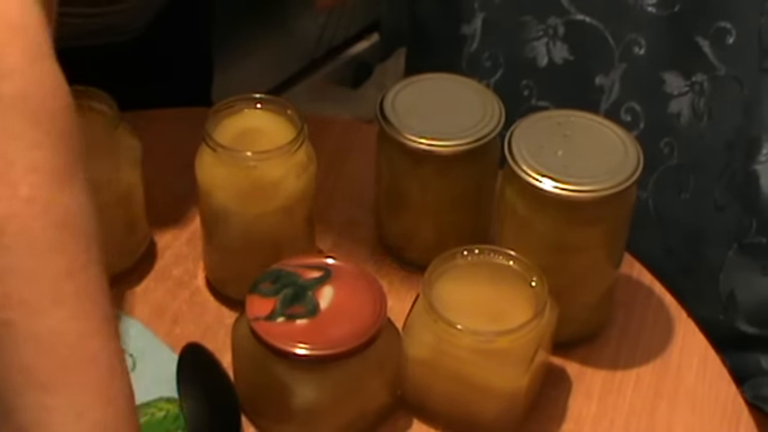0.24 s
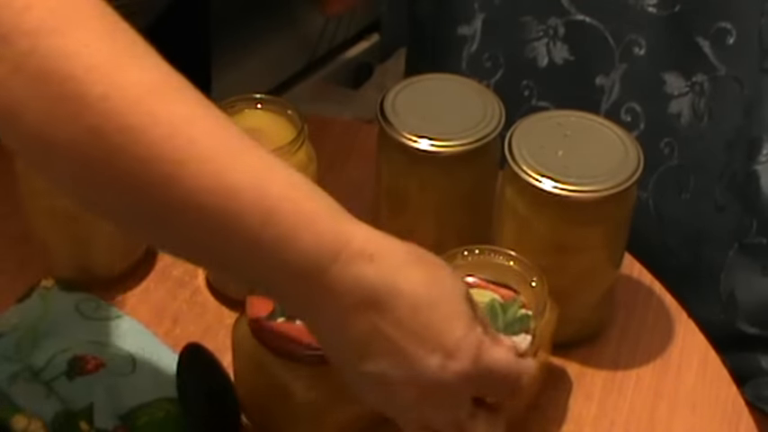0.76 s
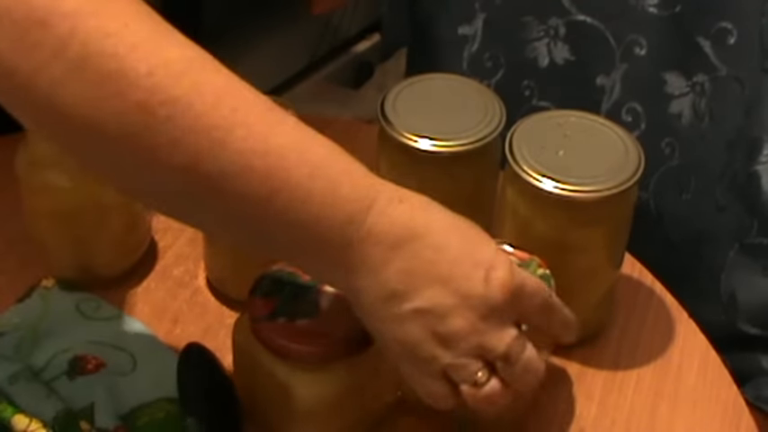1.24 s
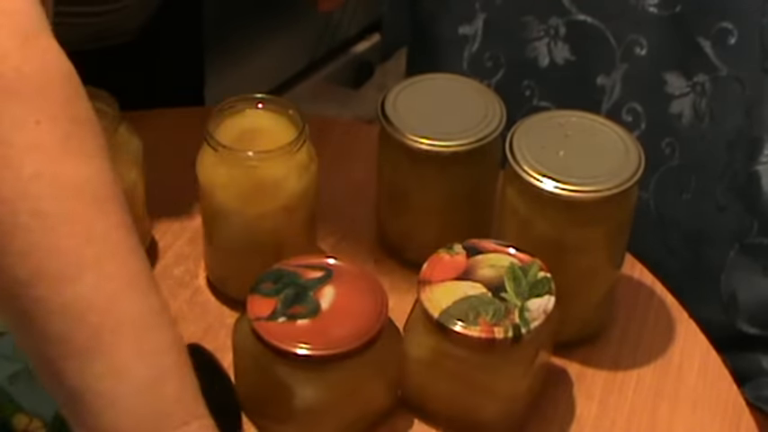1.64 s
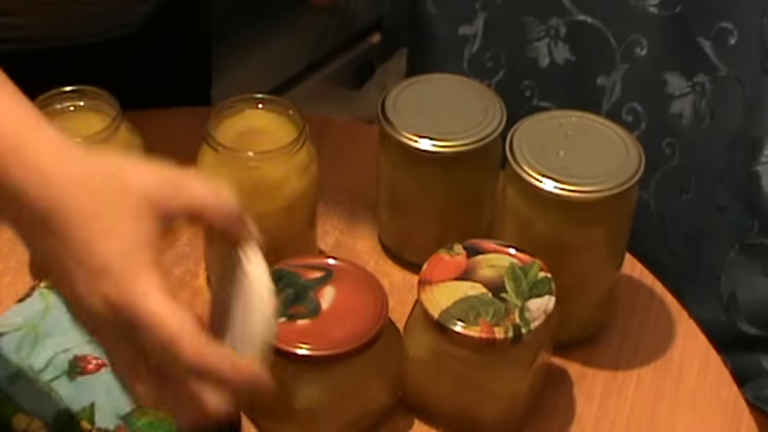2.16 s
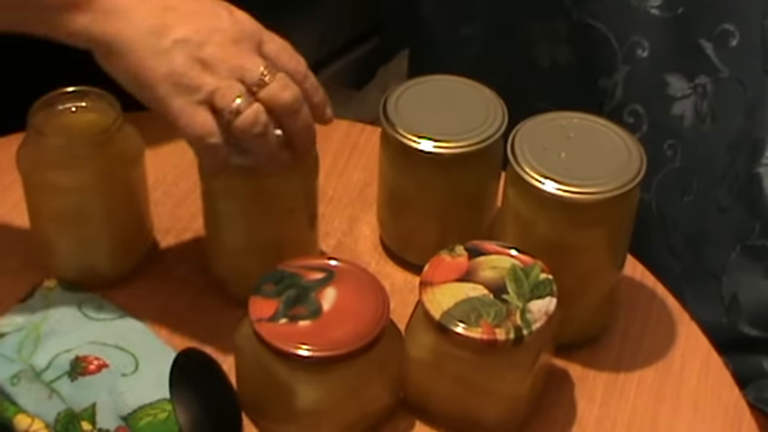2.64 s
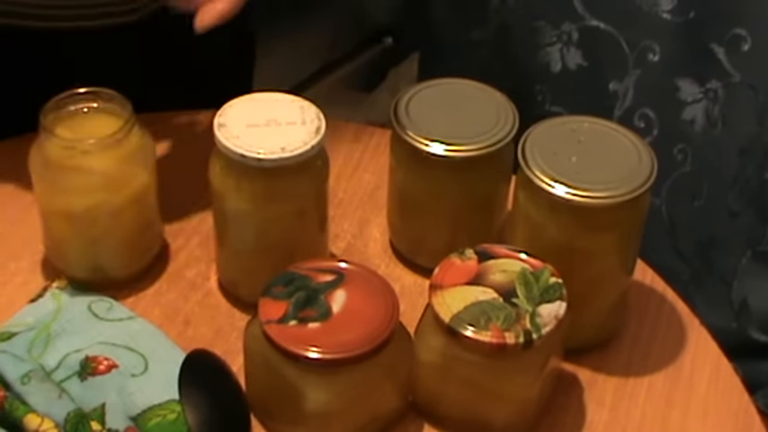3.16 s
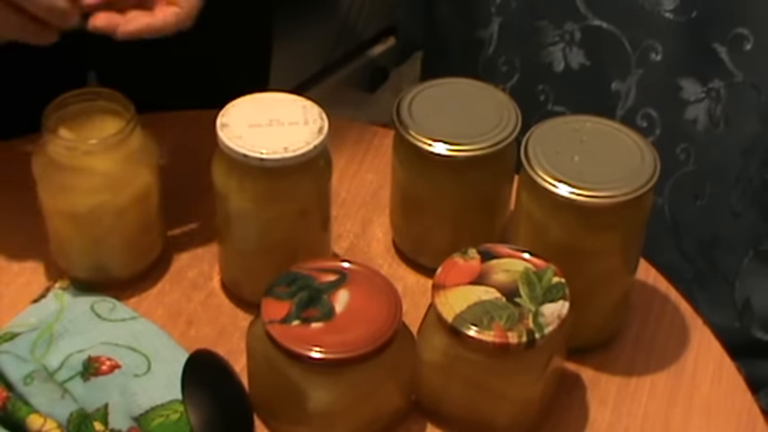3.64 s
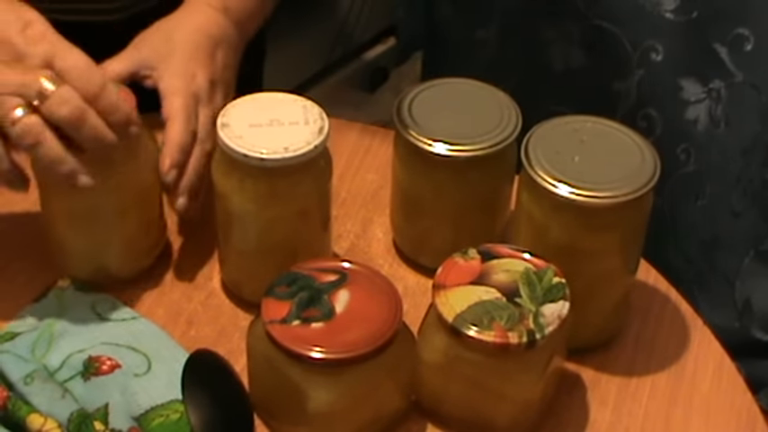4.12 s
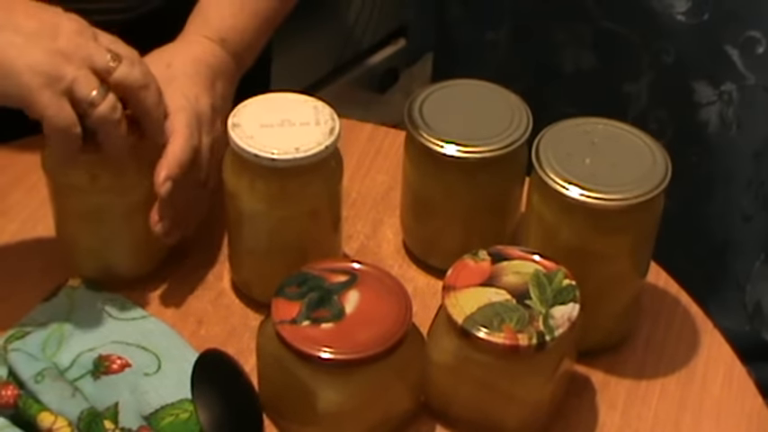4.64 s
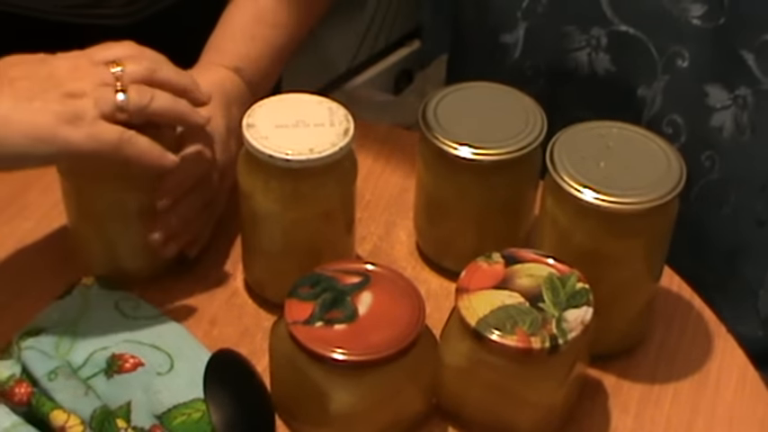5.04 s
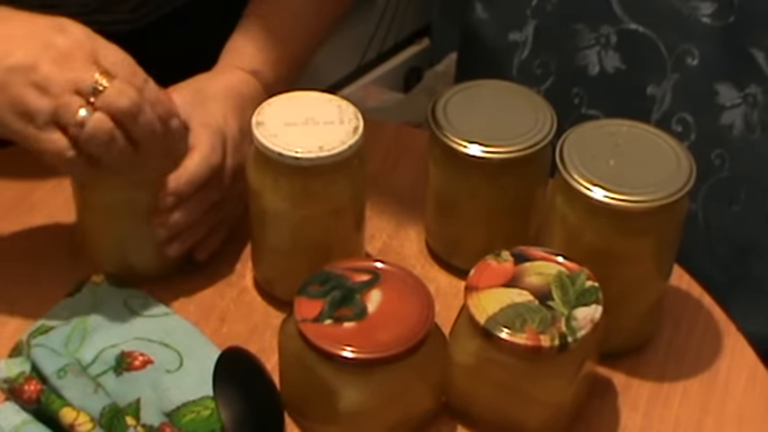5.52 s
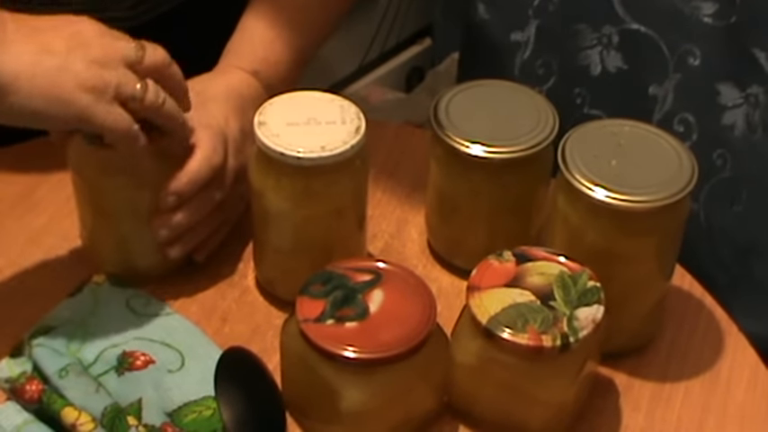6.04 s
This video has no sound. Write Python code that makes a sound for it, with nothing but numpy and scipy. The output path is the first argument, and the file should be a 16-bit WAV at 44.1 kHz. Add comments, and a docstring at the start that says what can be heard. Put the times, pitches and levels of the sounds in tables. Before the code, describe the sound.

In a quiet small kitchen, metal lids tap and clatter on filled jars and grind along glass threads, with a crisp click near the end.

```python
"""Screwing lids onto glass jars

Metal twist-off lids are set on three filled glass jars on a kitchen table and screwed down.
Touches are noise cracks plus decaying modes and clatter; twists are grains through a sagging resonance.
Jar slides, finger rub, table booms and one dry snap are shaped grains and noise.
All but the snap gets a small-room tail; noise, arm rustle and a thin whine lie beneath."""
import sys
import numpy as np
from scipy import signal
from scipy.fft import rfft, irfft, next_fast_len
from scipy.io import wavfile

SR = 44100
rng = np.random.default_rng(int(sys.argv[2]) if len(sys.argv) > 2 else 0)


def generate_wav(sig):
    """Save sig (samples, or channels by samples) to the path in sys.argv[1] as 16-bit PCM at SR."""
    pcm = np.round(np.clip(np.atleast_2d(sig).T, -1, 1) * 32767).astype(np.int16)
    wavfile.write(sys.argv[1], SR, pcm)


N = 276948

# Lid touches glass: t/s, force/dB, edge/dB (high: bare metal on rim, low: soft seal), rebounds
CONTACTS = [(0.513, -50.5, 5, 0), (0.53, -67.5, 18.5, 0), (0.601, -45.5, -6, 0), (0.783, -63, -5, 0),
            (0.827, -86, 19.5, 0), (1.1465, -27.5, -2, 0), (1.2256, -29.5, -1, 0), (1.253, -41, 6.5, 0),
            (1.364, -39.5, 0.5, 0), (1.384, -40.5, 6, 0), (1.394, -33.5, -17, 0), (1.399, -41.5, -12.5, 0),
            (1.416, -28.5, -14, 0), (1.4847, -30, -13.5, 0), (1.51, -38, -9, 0), (1.5548, -29.5, -8, 0),
            (1.565, -36, 2.5, 0), (1.576, -24, -2, 1), (1.595, -25, -4.5, 1), (1.64, -27, -4, 1),
            (1.656, -25.5, -12, 0), (2.894, -47.5, -5.5, 0), (2.9782, -33, -12.5, 0),
            (2.9844, -20.5, -15, 0), (3.0282, -22.5, -14, 2), (3.087, -37, -19, 0), (3.483, -52, 12, 0),
            (3.972, -70.5, 13.5, 0), (4.004, -65, 8.5, 0), (4.41, -29, -1, 1), (4.427, -33.5, -27, 0),
            (4.458, -38, -5.5, 0), (4.484, -31.5, -0.5, 1), (4.506, -34, -8, 0), (4.546, -51, -9.5, 0),
            (4.668, -38.5, -11.5, 0), (4.716, -44, -9.5, 0), (4.7444, -33, -7.5, 0),
            (4.7618, -36.5, -3.5, 1), (4.8271, -43, -8, 0), (4.873, -44.5, -7, 0), (4.89, -41, -3, 2),
            (4.914, -36, -14, 0), (5.284, -63, -23, 0), (5.872, -55.5, -7, 0), (6.029, -45, -39, 0),
            (6.076, -46.5, -11.5, 0), (6.1455, -45, -26, 0), (6.1676, -31.5, -17.5, 1), (6.191, -45, -3, 0)]
# Modes of a spare lid, a loose lid on the front jar's rim, each lidded jar,
# and the left jar seated and gripped: f/Hz, relative level/dB, t60/s
SPARE_MODES = [(1730, -6, 0.14), (2550, 2, 0.11), (2550, 1.5, 0.1), (3650, -3, 0.066), (3900, -20.5, 0.055),
               (4907, -6, 0.1), (5017, -7, 0.097), (6630, -8, 0.03)]
RIM_MODES = [(685, 3, .12), (1066, -12.5, .13), (1240, -17, 0.24), (1480, -12, 0.35), (1575, -4, 0.15),
             (1620, -7.5, .13), (2214, -11, 0.21), (2980, 1, 0.16), (3670, 10, 0.099), (3790, 7, 0.067),
             (3800, 2, 0.14), (4950, -6.5, .08), (9760, -22.5, 0.074), (10650, 14, 0.066),
             (11250, -27, .05)]
FRONT_MODES = [(681, -20.5, 0.18), (1060, -8, 0.096), (1450, -1, 0.26), (1550, -12, .17),
               (1683, -2.5, 0.16), (1720, 16, 0.086), (1810, -1.5, .14), (1810, -17, 0.17),
               (2146, -3.5, 0.21), (2190, 1, .15), (3030, -8.5, 0.16), (3456, -9.5, 0.1), (3840, -8, .18),
               (4880, -10, 0.14), (5790, -21, 0.19), (9650, -8, 0.043), (10640, 0, 0.025)]
MIDDLE_MODES = [(185, -13, 0.31), (302.5, -10.5, 0.17), (621.6, -9, 0.21), (897, -15, 0.15),
                (958, -30, 0.21), (1528, -10, 0.22), (1685, -18, 0.22), (1690, -15, 0.16),
                (1877, 11.5, 0.077), (1767, -8, 0.16), (1870, 6, 0.14), (2596, -14, 0.1),
                (3760, -18, 0.089), (4050, -4, 0.08), (4510, -27, 0.099)]
LEFT_MODES = [(458, -23, 0.11), (1590, -15.5, 0.15), (1644, 3, 0.2), (1782, 7.5, 0.2), (1877, 2.5, 0.14),
              (1930, -6, 0.13), (2510, -15.5, 0.12), (3650, -19, 0.091), (3757, -7.5, 0.088),
              (4600, -27, 0.066), (5000, -19.5, 0.1), (6360, -35, 0.063), (6700, -24, 0.088),
              (7940, -30, 0.08)]
SEATED_MODES = [(444, -15, 0.24), (1031, -9.5, 0.078), (1128, 0, 0.11), (1320, -4, 0.29), (1690, -22, 0.17),
                (1780, 4, 0.18), (1850, -20, 0.15), (2060, 8, 0.17), (3460, -10, 0.12), (3900, -5, 0.066),
                (4080, -1, 0.03), (3930, -5, 0.17), (6953, 4, 0.062), (7640, 8, 0.054), (9640, 3, 0.046),
                (9900, -23, 0.085)]
GRIPPED_MODES = [(455, -1, 0.12), (1136, 0, .12), (1333, 2, 0.068), (1505, 3.5, 0.063), (1699, -1.5, 0.09),
                 (2565, -14.5, 0.12), (4330, -8, 0.05), (4960, -3, 0.024), (6400, -23, 0.059)]
# Dense clatter between those modes: f/Hz, relative density/(dB per Hz)
SPARE_CLATTER = [(120, -49), (200, -20), (957, -12.5), (1300, -23), (1620, -7), (2560, -17), (2800, -16.5),
                 (4920, -19.5), (7220, -17), (8200, -10), (15500, -21)]
RIM_CLATTER = [(88, -52), (150, -15), (296, -4), (561, -11), (631, 4), (912, -12), (1570, 2), (1870, -10),
               (2700, -8), (2920, 1.5), (3550, -14.5), (3830, -2), (7000, -37.5), (10300, -22),
               (15500, -38.5)]
FRONT_CLATTER = [(100, -25), (160, -22), (500, -21.5), (690, -15), (1100, -16), (1300, -12), (1700, 2),
                 (2500, -24.5), (3000, -14), (3800, -15.5), (4200, -23.5), (4900, -21.5), (5800, -33.5),
                 (7700, -30.5), (8600, -32.5), (10400, -28.5), (12000, -30), (15500, -39.5)]
MIDDLE_CLATTER = [(100, -36), (270, -20), (450, -41), (950, -26.5), (1250, -43), (1600, -10.5), (1880, -5),
                  (2150, -37.5), (2450, -44), (2700, -26.5), (4000, -23), (5500, -35), (10000, -22.5),
                  (15500, -29)]
GRIPPED_CLATTER = [(100, -18.5), (420, -18), (720, -21.5), (1150, -1), (1650, 8.5), (2200, -16.5),
                   (3100, -26), (3900, -10.5), (4800, -14.5), (5700, -23.5), (6800, -11.5), (8800, -16),
                   (11500, -14.5), (15500, -40.5)]
LEFT_CLATTER = [(100, -28), (420, -9.5), (700, -17), (1150, -6.5), (1750, 5.5), (2300, -12), (3000, -24),
                (3800, -16.5), (4800, -22.5), (5700, -21.5), (7200, -24), (8600, -17), (11000, -16),
                (15500, -33)]
# Lid being handled: from t/s, modes, clatter, clatter beside modes/dB,
# table knock beside ring/dB, edge tick beside ring/dB
IN_HAND = [(0, SPARE_MODES, SPARE_CLATTER, 4, -9, -6.5), (.7, RIM_MODES, RIM_CLATTER, -11, -7, 3),
           (1.2, RIM_MODES, RIM_CLATTER, 3.5, -7.5, -1),
           (1.375, FRONT_MODES, FRONT_CLATTER, -0.5, -12.5, 1.5),
           (2.5, MIDDLE_MODES, MIDDLE_CLATTER, -1.5, -20, -2),
           (3.3, SPARE_MODES, SPARE_CLATTER, -8, -4.5, -6.5),
           (3.8, SPARE_MODES, SPARE_CLATTER, 19, -6, -8.5),
           (4.2, LEFT_MODES, LEFT_CLATTER, -7, -14.5, -6.5),
           (4.47, SEATED_MODES, LEFT_CLATTER, -1, -7.5, 3.5),
           (4.6, GRIPPED_MODES, GRIPPED_CLATTER, 3, -13.5, -1.5),
           (5.8, GRIPPED_MODES, GRIPPED_CLATTER, 0.5, -3, 3.5)]
# Bands of knock, ring, clink, tick: low f/Hz, high f/Hz
REGISTERS = [(120, 900), (900, 2500), (2500, 6000), (6000, 16000)]
# Clatter decay in each register: t60/s
REGISTER_T60_S = [0.18, 0.13, 0.17, 0.075]
# Share of the edge dB that lifts each register: ratio
EDGE_SHARE = (0, 0, 1, 1.2)
# Twists of the wrist: t/s, attack/s, hold/s, scrape before trim/dB, rasp before trim/dB,
# sag of the lid's resonance under the palm/Hz
TWISTS = [(1.266, 0.011, 0.16, -41, -40.5, 27), (1.402, 0.023, 0.065, -32.5, -69, 35),
          (4.498, .05, .22, -33, -48, 356), (4.873, 0.024, 0.011, -31.5, -50, 130),
          (5.854, 0.086, 0.215, -32, -52, 554), (6.149, 0.012, 0.011, -21.5, -48, 540)]
# Hand-damped lid, low scrape and high rasp: f/Hz, relative density/(dB per Hz)
SCRAPE = [(100, -13), (300, -6), (460, -2.5), (680, -4.5), (1100, -4), (1500, -13.5), (1850, 4), (2150, -2),
          (2550, -8.5), (3000, -30), (5000, -55)]
RASP = [(2200, -15), (3000, -8), (3600, 8.5), (4200, 1), (4850, 5), (5700, -6.5), (6600, -3.5),
        (8200, -13.5), (11000, -10), (15500, -22)]
# Fingers on the left jar: t/s, attack/s, hold/s, level/dB
GRIP = (3.99, .04, .31, -62)
# Rub of the fingers: f/Hz, relative density/(dB per Hz)
SKIN = [(600, -33), (1400, -9), (2100, 0.5), (3000, -19), (3700, -4), (5500, -25), (12000, -30)]
# Jars nudged and slid on the table: t/s, attack/s, hold/s, level/dB
SLIDES = [(1.993, 0.02, 0.024, -48), (4.917, 0.0088, 0.0034, -42), (4.987, 0.036, .04, -46),
          (6.153, 0.012, 0.0093, -40), (6.249, 0.043, .01, -37)]
# Table top: f/Hz, relative density/(dB per Hz)
TABLE = [(29, -40.5), (50, -38), (142, 0), (239, -13), (303, 1), (532, -3), (793, -14.5), (1010, -4.5),
         (1210, -16), (1390, -10), (6000, -30.5), (7800, -59), (13200, -120)]
# Jar standing on the table: f/Hz, relative level/dB, t60/s
STANDING_MODES = [(293.4, -2, 0.36), (610, -12, 0.26), (695, -5, 0.13), (808, -11, 0.13), (1607, -10, 0.15),
                  (1727, 0, 0.063)]
# Weight put on the table: t/s, level/dB
THUMPS = [(1.569, -54), (2.01, -48), (6.17, -53)]
# Boom of the table: f/Hz, relative density/(dB per Hz)
BOOM = [(20, -8), (50, -11), (110, 4), (170, -15), (400, -43)]
# Dry snap: t/s, level before trims/dB
SNAP = [(5.731, -16)]
# Resonances of the snap: f/Hz, width/Hz, relative level/dB
SNAP_BODY = [(884, 41, 9.5), (1550, 50, 9), (2134, 91, 13.5), (3400, 300, 6.5), (6470, 1500, -38),
             (10500, 3000, -27)]
# Rattle of the snap: f/Hz, relative density/(dB per Hz)
SNAP_RATTLE = [(300, -43), (800, 0.5), (2300, 5), (3800, -2), (5000, -12.5), (9000, -14.5), (15000, -30)]
# Room noise and rustle: f/Hz, relative density/(dB per Hz)
AIR = [(12, -28), (20, -10), (44, -6.5), (161, -1.5), (207, -5.5), (232, -4.5), (333, -2), (427, -5),
       (534, -7.5), (581, -8), (1040, -12.5), (1670, -13.5), (3170, -14), (4070, -16.5), (15500, -18.5)]
# Stereo width of room noise and rustle: f/Hz, side gain/dB
AIR_WIDTH = [(60, -17), (110, -13.5), (200, -7.5), (380, -6), (700, 1), (1290, 1), (2380, -2), (4400, -3.5),
             (8120, -5), (15000, -9)]
# Arm reaching over: t/s, attack/s, hold/s, level/dB
REACHES = [(-.1, 0.076, 0.6, -57), (2.2, 0.16, .25, -61)]
# Stereo width of jars, table and room tail: f/Hz, side gain/dB
WIDTH = [(100, -16), (450, -17), (1100, -9), (2500, -11), (5000, -11), (9000, -14), (15000, -12)]
# Decay of the room: f/Hz, t60/s
KITCHEN = [(150, 0.55), (1500, 0.22), (5000, 0.17), (14000, 0.19)]

# Each rebound: flight, loss of force, loss of edge
REBOUND_S, REBOUND_LOSS_DB, REBOUND_DULL_DB = .0095, 5.5, 7
# Soft seal: dB more crack per dB of negative edge, and the most negative edge that counts
SEAL_CRACK_DB_PER_DB, SEAL_MAX_DB = 0.38, 7.5
FREE_LID_HZ = 1694  # lid's resonance without the palm
LET_GO_S = .03  # palm finishes lifting this long after the hold
SWELL_DB, RELEASE_DB_PER_S = 31.5, 340  # rise during a rub's attack; fall after its hold
# Lug slips: mean rate/Hz, decay time constant/s, largest single jerk over the steady grind/dB
SLIP_HZ, SLIP_S, SLIP_DB = 89, .004, 7.5
WHINE_HZ, TOP_HZ = 15625, 16000


def amp(db):
    """Decibels to gain."""
    return 10 ** (np.asarray(db) / 20)


def unit(x):
    """Scale to rms 1."""
    return x / np.sqrt(np.mean(x ** 2) + 1e-20)


def along(points, hz):
    """Interpolate (f/Hz, value) points on a log frequency axis."""
    f, v = np.transpose(points)
    return np.interp(np.log(hz + 1), np.log(f + 1), v)


def filtered(x, response):
    """Multiply the spectrum of x by a response of frequency."""
    n = x.shape[-1]
    padded = next_fast_len(n + 8192)
    hz = np.fft.rfftfreq(padded, 1 / SR)
    return irfft(rfft(x, padded) * response(hz), padded)[..., :n]


def coloured(x, spectrum):
    """Shape x by a spectrum, at rms 1."""
    return unit(filtered(x, lambda hz: amp(along(spectrum, hz))))


def resonance(hz, centre_hz, width_hz):
    """Causal response of one mode."""
    damping = 1j * hz * width_hz
    return damping / (centre_hz ** 2 - hz ** 2 + damping)


def stereo(pair, width=WIDTH):
    """Use two signals as the mid and the width-scaled side of a stereo image."""
    side = filtered(pair[1], lambda hz: amp(along(width, hz)))
    return np.array([pair[0] + side, pair[0] - side])


def add(out, s, sound):
    """Mix a sound in at a time in seconds."""
    part = out[:, round(s * SR):][:, :sound.shape[1]]
    part += sound[:, :part.shape[1]]


def stroke(s, attack_s, hold_s, db):
    """Gain of one rub: dB-linear swell, hold and release."""
    t = np.arange(N) / SR - s
    swell_db = SWELL_DB * (1 - np.clip(t / attack_s, 0, 1))
    release_db = RELEASE_DB_PER_S * np.maximum(t - attack_s - hold_s, 0)
    return (t > 0) * amp(db - swell_db - release_db)


def grit(rate_hz, spread_db):
    """Friction as two streams of random impulses, uneven in size and sign."""
    sizes = amp(spread_db * rng.standard_normal((2, N)))
    signs = rng.choice([-1, 1], (2, N))
    return sizes * signs * (rng.random((2, N)) < rate_hz / SR)


def puff(spectrum, t60_s, width=WIDTH):
    """Coloured stereo noise that decays exponentially; its mid and raw side are at rms 1 before decay."""
    t = np.arange(SR // 2) / SR
    noise = coloured(rng.standard_normal((2, len(t))), spectrum)
    return stereo(noise, width) * amp(-60 * t / t60_s)


def ringing(modes, t, scatter_db=2, detune=0.0044, rise_s=0.0013):
    """Decaying sine modes with random strength, phase and place; detuning grows with frequency."""
    hz, db, t60_s = np.transpose(modes)[:, :, None]
    strength, grip, place, phase = rng.standard_normal((4, len(modes), 1))
    pitch_hz = hz * (1 + detune * grip * np.sqrt(hz / 5000))
    envelope = amp(db + scatter_db * strength - 60 * t / t60_s)
    waves = envelope * np.sin(2 * np.pi * (pitch_hz * t + phase))
    mid = waves.sum(0)
    side = (waves * place * amp(along(WIDTH, hz))).sum(0)
    return np.array([mid + side, mid - side]) * (1 - np.exp(-t / rise_s))


def causal(spectrum, size=2048):
    """Minimum-phase impulse response of a body: it rings after the push, never before."""
    cepstrum = irfft(np.log(amp(along(spectrum, np.fft.rfftfreq(size, 1 / SR)))))
    cepstrum[1:size // 2] *= 2
    cepstrum[size // 2 + 1:] = 0
    return irfft(np.exp(rfft(cepstrum)))


def touches():
    """Contacts and their rebounds, each weaker and duller: t/s, force/dB, edge/dB."""
    hits = []
    for s, force_db, edge_db, rebounds in CONTACTS:
        for k in range(round(rebounds) + 1):
            hits.append((s + k * REBOUND_S, force_db - k * REBOUND_LOSS_DB, edge_db - k * REBOUND_DULL_DB))
    return hits


def contacts(crack_s=0.0034, crack_db=-6):
    """Each touch is a short crack, then lid, glass and table ring and clatter on."""
    out, t = np.zeros((2, N)), np.arange(SR // 3) / SR
    bands = [signal.butter(5, edges, "band", fs=SR, output="sos") for edges in REGISTERS]

    def level_start(x):
        """Scale to rms 1 over the first 30 ms."""
        return x / np.sqrt(np.mean(x[:, t < .03] ** 2))

    def in_band(band, x):
        """One register of x, at a common starting level."""
        return level_start(signal.sosfilt(band, x + 1e-20))

    for s, force_db, edge_db in touches():
        _, modes, clatter, clatter_db, knock_db, tick_db = [lid for lid in IN_HAND if lid[0] <= s][-1]
        body = causal(clatter)[None]
        ring = ringing(modes, t)
        # crack and rattle both pass through the lid's body
        crack_force = stereo(rng.standard_normal((2, len(t)))) * np.exp(-t / crack_s)
        burst = signal.fftconvolve(crack_force, body, axes=1)[:, :len(t)]
        rattle_force = stereo(rng.standard_normal((2, len(t))))
        dense = signal.fftconvolve(rattle_force, body, axes=1)[:, :len(t)]
        # force lifts every register, edge only the high ones
        levels_db = force_db + np.array([knock_db, 0, 0, tick_db]) + edge_db * np.array(EDGE_SHARE)
        # on the seal, the crack stands out more beside the ring
        crack = amp(crack_db - SEAL_CRACK_DB_PER_DB * np.clip(edge_db, -SEAL_MAX_DB, 0))
        for band, t60_s, db in zip(bands, REGISTER_T60_S, levels_db):
            tone = in_band(band, ring)
            rattle = in_band(band, dense * amp(-60 * t / t60_s))
            hit = in_band(band, burst)
            ring_on = level_start(tone + amp(clatter_db) * rattle)
            add(out, s, amp(db) * (ring_on + crack * hit))
    return out


def stick_slip():
    """Gain of lugs that stick and let go: uneven decaying jerks over a steady grind, at rms 1."""
    chance, size = rng.random((2, N))
    jerks = (chance < SLIP_HZ / SR) * size
    decay = np.exp(-1 / (SLIP_S * SR))
    return unit(1 + amp(SLIP_DB) * signal.lfilter([1], [1, -decay], jerks))


def screwing(scrape_db=-4.0, rasp_db=-3.5, width_hz=300, broad=0.12, singing=2.2):
    """Lugs grind over the glass thread; palm pressure sags the lid's resonance through each twist."""
    out = np.zeros((2, N))
    slips = grit(rate_hz=2600, spread_db=3.0) * stick_slip()

    def jar(hz):
        """The gripped jar's fixed modes stand out of the scrape."""
        modes = sum(amp(db) * resonance(hz, f, np.log(1000) / (np.pi * t60_s))
                    for f, db, t60_s in GRIPPED_MODES)
        return 1 + singing * modes

    body = filtered(coloured(slips, SCRAPE), jar)
    rasp = stereo(coloured(slips + 0.036 * rng.standard_normal((2, N)), RASP))
    # fixed resonances, crossfaded to make a moving one
    centres_hz = np.linspace(1050, 1850, 7)
    rings = []
    for c in centres_hz:
        ring = filtered(body, lambda hz: broad + resonance(hz, c, width_hz) ** 2)
        rings.append(stereo(unit(ring)))
    for s, attack_s, hold_s, low_db, high_db, sag_hz in TWISTS:
        progress = np.clip((np.arange(N) / SR - s) / (attack_s + hold_s + LET_GO_S), 0, 1)
        lid_hz = FREE_LID_HZ - sag_hz * np.sin(np.pi * progress)
        shares = np.eye(len(centres_hz))
        lid = sum(ring * np.interp(lid_hz, centres_hz, share) for ring, share in zip(rings, shares))
        out += stroke(s, attack_s, hold_s, low_db + scrape_db) * lid
        out += stroke(s, attack_s, hold_s, high_db + rasp_db) * rasp
    return out


def snap(click_db=1, rattle_db=-14, rattle_t60_s=0.049, tail_db=-35, tail_t60_s=0.264):
    """An impulse through a few resonances, with a brief noise rattle and a faint tail."""
    out, t = np.zeros((2, N)), np.arange(SR // 2) / SR

    def body(hz):
        """Sum of the snap's resonances."""
        return sum(amp(db) * resonance(hz, f, width_hz) for f, width_hz, db in SNAP_BODY)

    click = filtered(1. * (t == 0), body)
    click = amp(click_db) * click / np.abs(click).max()
    for s, db in SNAP:
        rattle = amp(rattle_db) * puff(SNAP_RATTLE, rattle_t60_s)
        tail = amp(tail_db) * puff(SNAP_RATTLE, tail_t60_s)
        add(out, s, amp(db) * (click + rattle + tail))
    return out


def sliding():
    """A jar's foot judders dully on the table top: grains shaped by the table."""
    rub = stereo(coloured(grit(rate_hz=1200, spread_db=3), TABLE))
    return rub * sum(stroke(*slide) for slide in SLIDES)


def settling(ring_db=-34, clatter_db=-46, t60_s=0.19):
    """A jar knocked a moment earlier still rings out: modes plus table noise."""
    out, ring = np.zeros((2, N)), ringing(STANDING_MODES, np.arange(SR // 2) / SR)
    add(out, 0, amp(ring_db) * ring / np.abs(ring).max() + amp(clatter_db) * puff(TABLE, t60_s))
    return out


def thumps(t60_s=0.31, rise_s=0.0056):
    """The table booms softly under a leaning hand: low noise, soft onset, decay."""
    out, t = np.zeros((2, N)), np.arange(SR // 2) / SR
    for s, db in THUMPS:
        add(out, s, amp(db) * puff(BOOM, t60_s) * (1 - np.exp(-t / rise_s)))
    return out


def fingers():
    """Fingers brush over lid and glass, finding their grip: dense uneven grains."""
    return stroke(*GRIP) * stereo(coloured(grit(rate_hz=5600, spread_db=7.5), SKIN))


def kitchen(x, build_s=0.0057):
    """Room tail: noise that builds up quickly and decays by frequency, convolved with x."""
    hz, t, z = signal.stft(rng.standard_normal((2, SR // 2)), SR, nperseg=256)
    decay = amp(-60 * t / along(KITCHEN, hz)[:, None])
    tail = signal.istft(z * decay * (1 - np.exp(-t / build_s)), SR, nperseg=256)[1]
    tail = stereo(tail)
    return signal.fftconvolve(x, tail / np.linalg.norm(tail[0]), axes=1)[:, :N]


def background(air_db=-58.0, whine_db=-75):
    """Steady room noise, the noise rustle of a reaching arm and an appliance's sine whine."""
    air = stereo(coloured(rng.standard_normal((2, N)), AIR), AIR_WIDTH)
    rustle = stereo(coloured(rng.standard_normal((2, N)), AIR), AIR_WIDTH)
    reaching = sum(stroke(*reach) for reach in REACHES) * rustle
    whine = np.sin(2 * np.pi * WHINE_HZ * np.arange(N) / SR)
    return amp(air_db) * air + reaching + amp(whine_db) * whine


def scene(room_db=-12):
    """Lids and jars with the room's answer, plus the dry snap and background."""
    lids = contacts() + screwing()
    handling = lids + sliding() + settling() + thumps() + fingers()
    return handling + amp(room_db) * kitchen(handling) + snap() + background()


def record(dry):
    """Band limit: nothing from TOP_HZ up."""
    return filtered(dry, lambda hz: hz < TOP_HZ)


dry = scene()
out = record(dry)
generate_wav(out)
```